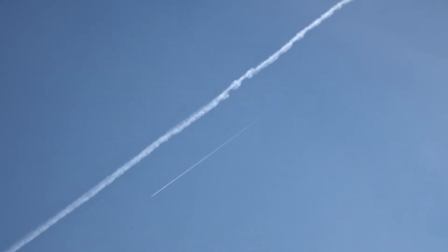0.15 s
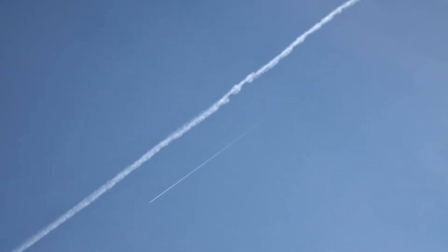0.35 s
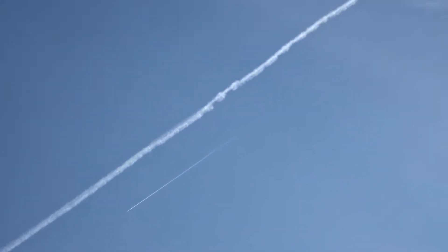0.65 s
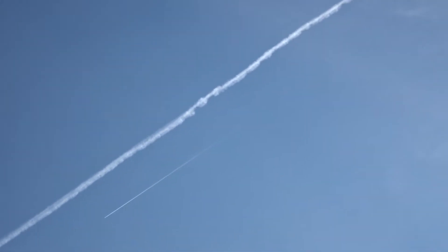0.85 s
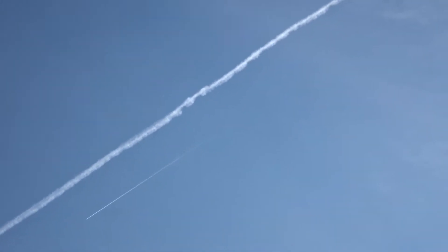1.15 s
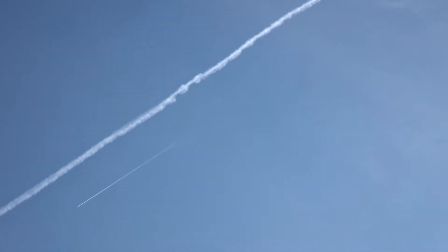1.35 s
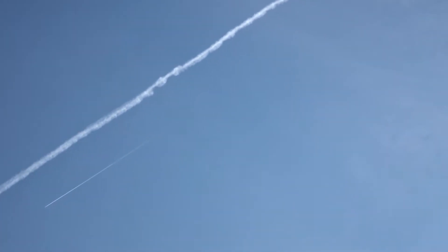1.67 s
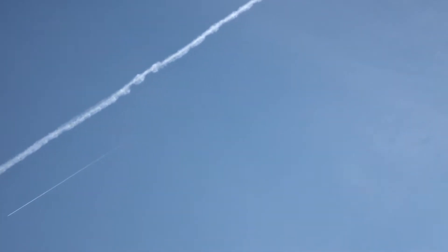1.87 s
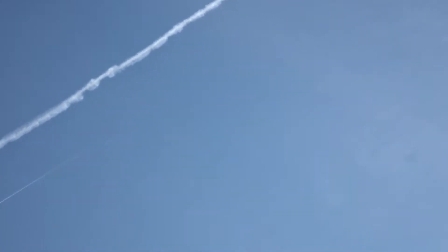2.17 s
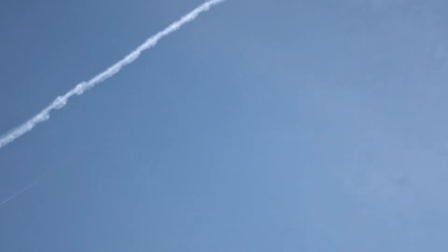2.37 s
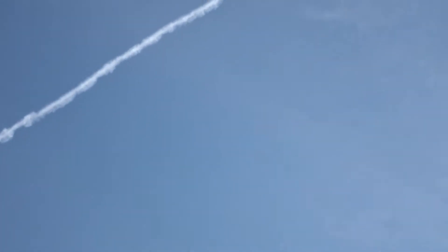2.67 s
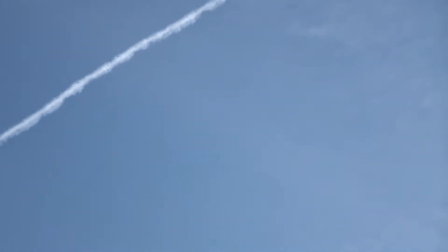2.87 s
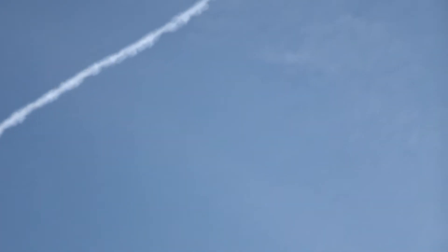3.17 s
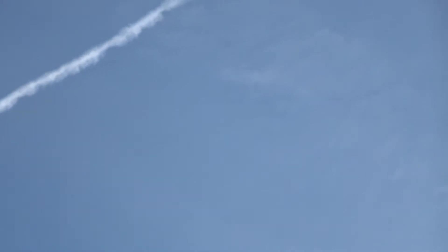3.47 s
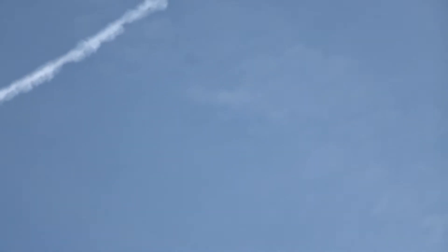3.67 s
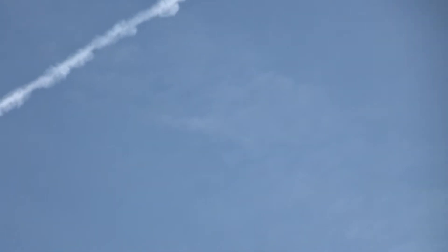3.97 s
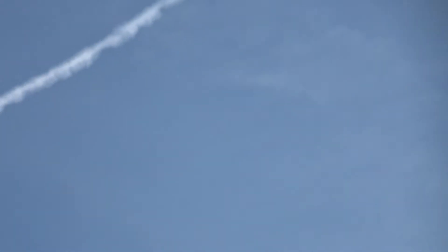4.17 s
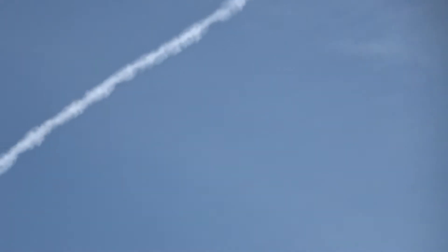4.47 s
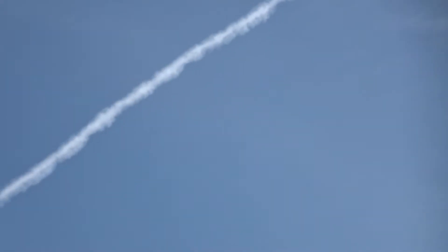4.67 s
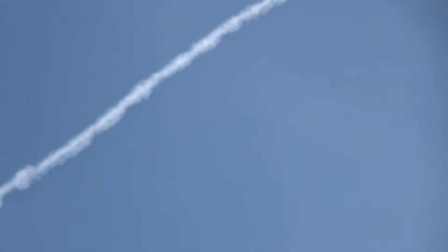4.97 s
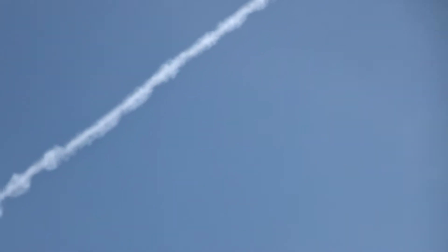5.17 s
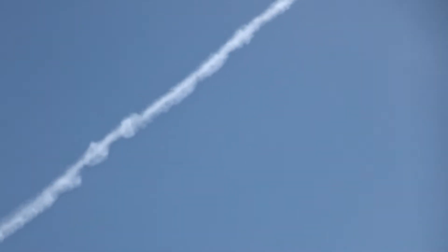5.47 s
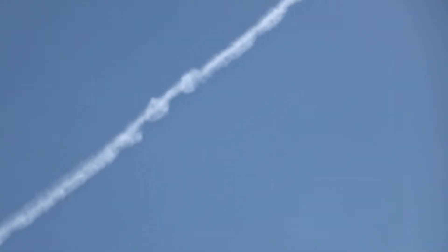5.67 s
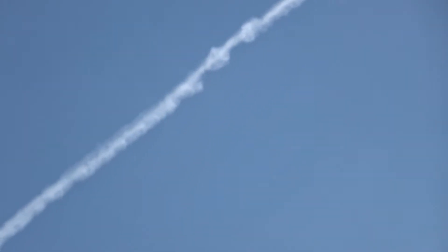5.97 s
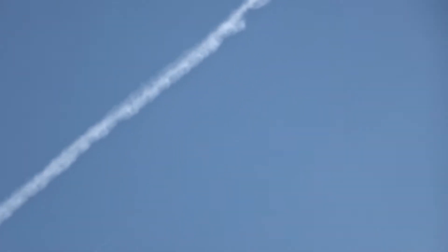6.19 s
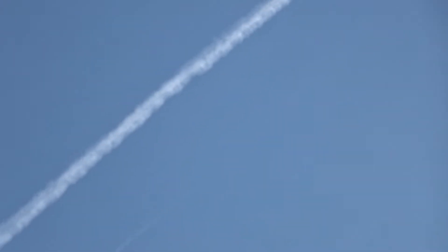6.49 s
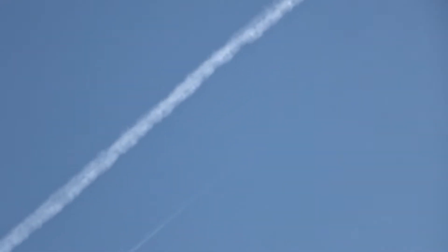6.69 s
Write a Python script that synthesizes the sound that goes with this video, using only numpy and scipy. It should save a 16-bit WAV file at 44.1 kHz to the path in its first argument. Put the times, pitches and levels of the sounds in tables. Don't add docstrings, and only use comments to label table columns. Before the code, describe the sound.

A car rushes past close by with whining tyres, swings off to the right and fades down the street over faint distant traffic.

```python
import sys
import numpy as np
from scipy import signal
from scipy.fft import rfft, irfft, next_fast_len
from scipy.io import wavfile
from scipy.ndimage import uniform_filter1d, map_coordinates

SR = 44100
rng = np.random.default_rng(int(sys.argv[2]) if len(sys.argv) > 2 else 0)


def wrap_up_sound(samples):
    columns = np.atleast_2d(samples).T
    tamed = np.clip(columns, -1, 1)
    steps = np.round(tamed * 32767).astype(np.int16)
    wavfile.write(sys.argv[1], SR, steps)


def boost(x):
    u = np.asarray(x, float) / 20
    return 10 ** u


N = 301196
WIN, HOP = 1024, 256
HZ = np.maximum(np.arange(WIN // 2 + 1) * SR / WIN, 1)[:, None]

# pitch_hz, likeness_scattered (0-1), likeness_in_sight (0-1),
# pan_share_near, pan_share_away
PORTS = [(60, 0.92, 0.94, 0.29, -0.59), (296, 0.99, 1, 0.074, 0.3), (660, 0.94, 0.96, 0.28, 0.18),
         (985, 0.9, 0.95, 0.61, 0.93), (1505, 0.96, 0.24, 0.65, 0.74), (1920, 0.2, 0.81, 0.76, 0.63),
         (2690, 0.76, 0.66, 1.09, -0.62), (3820, 0.5, 0.34, 0.25, 1.65), (4560, 0.75, 0.49, 0.037, 0.42),
         (5400, 0.06, 0.64, 0.08, -0.24), (6700, 0.42, 0.9, -0.24, 0.78), (7800, 0, 0.45, -0.29, -0.48),
         (10000, 0, 0.46, 0.19, 0.63), (10700, 0.13, 0.45, -0.099, 2.2)]
LAG_AWAY = 4.2
TOP_HZ = 11090


def over_hz(table, index=1):
    t = np.array(table)
    return np.interp(np.log(HZ), np.log(t[:, 0]), t[:, index])


def over_time(table, at):
    s, *columns = np.transpose(table)
    return [np.interp(at, s, c) for c in columns]


def after(t, s, span):
    return .5 + .5 * np.tanh((t - s) / span / 2)


def swells(t, table, span):
    return sum(db * np.exp(-((t - s) / span) ** 2) for s, db in table)


def resonances(hz, table):
    return sum(db * np.exp(-((hz - centre) / w) ** 2) for centre, w, db in table)


def walk(frames, rate, bands_per_octave):
    lattice = rng.standard_normal((40, 400))
    rows = np.log2(np.maximum(HZ, 30) / 30) * bands_per_octave + 0 * frames
    columns = np.clip(frames * rate, 0, 398) + 0 * HZ
    field = map_coordinates(lattice, [rows, columns], order=3)
    return field / field.std()


def spread(gain, alike, lag, pan_db):
    noise = rng.standard_normal((3, N))
    shared, left, right = signal.stft(noise, SR, nperseg=WIN, noverlap=WIN - HOP)[2]
    alike = np.clip(alike, 0, 1)
    lag = lag / (1 + (2400 / HZ) ** 6)
    left = np.sqrt(alike) * shared * np.exp(-2j * np.pi * HZ * lag / SR) + np.sqrt(1 - alike) * left
    right = np.sqrt(alike) * shared + np.sqrt(1 - alike) * right
    pair = gain * np.array([left * boost(pan_db / 2), right * boost(-pan_db / 2)])
    return signal.istft(pair, SR, nperseg=WIN, noverlap=WIN - HOP)[1][:, :N]


def drone(t, hz, db, width, count):
    kicks = rng.standard_normal((count, N)) * np.sqrt(2 * np.pi * width / count / SR)
    drift = np.cumsum(uniform_filter1d(uniform_filter1d(kicks, size=90), size=90), axis=1)
    own_hz = hz + (np.arange(count)[:, None] / (count - 1) - .5) * width
    start = 2 * np.pi * rng.random((count, 1))
    return 2 * np.pi * np.cumsum(own_hz, axis=1) / SR + drift + start, boost(db) * np.sqrt(2 / count)


def bearing(t):
    return 1.5 - 14 * after(t, 0.78, 0.26) + 3.5 * after(t, 1.7, 0.22)


def damper(frames):
    loss_db = -12.5 * np.exp(-((frames - 2.35) / 1.17) ** 2) - 5.0
    loss_db = loss_db + 8 * after(frames, 3.87, 0.034)
    loss_db = loss_db - 7 * (after(frames, 3.705, .006) - after(frames, 3.785, .008))
    edge_hz = 4100 + 450 * (1 - after(frames, 2.4, 0.1))
    return loss_db / (1 + (edge_hz / HZ) ** 24)


def passing_bands(frames):
    band_changes = [(.1, .16, 4650, 4680, -5), (.15, .16, 2450, 2450, 2.5), (.15, 0.085, 4020, 3950, 3),
                    (.55, 0.19, 2600, 2620, -8), (.69, .1, 2850, 3280, -9), (.72, 0.065, 4300, 4200, -4),
                    (.92, 0.072, 2420, 2550, -8), (1.03, 0.18, 3500, 3600, 1), (1.15, 0.083, 1900, 1850, -5),
                    (1.3, .15, 3250, 3250, 1), (1.47, 0.079, 1460, 1450, 7), (1.62, .1, 4750, 4750, -6),
                    (1.9, 0.24, 2980, 3000, -9), (1.9, 0.44, 7700, 7700, 1.5), (2.1, 0.19, 4070, 4150, 7),
                    (2.2, 0.13, 10050, 10050, 2), (2.9, 0.3, 1220, 1300, -6), (3.0, .6, 7950, 7800, -8),
                    (3.0, 0.23, 6200, 6200, 3), (3.1, 0.21, 3700, 3700, 4), (3.25, 0.33, 4400, 4400, -6),
                    (3.4, 0.32, 3100, 3100, -6)]
    width = 0.044
    out = 0
    for s, span, first_hz, last_hz, db in band_changes:
        along = (frames - s) / span
        hz = (first_hz + last_hz) / 2 + (last_hz - first_hz) / 2 * np.clip(along, -2, 2)
        out = out + db * np.exp(-along ** 2 - ((HZ / hz - 1) / width) ** 2)
    return out


def town(frames):
    # pitch_hz, level_db (per Hz)
    far_colour = [(50, -28), (125, -21.5), (180, -14.5), (300, 1), (420, -24), (750, 1), (1100, 3.5),
                  (1450, 1.5), (1900, -1.5), (2500, -9.5), (3300, -13.5), (4500, -20.5), (6500, -30.5),
                  (11000, -47)]
    gain = boost(over_hz(far_colour))
    gain = gain * boost(-47.5) / np.sqrt(np.mean(gain ** 2))
    bass = 1 / (1 + (HZ / 250) ** 2)
    swell_db = (1.4 + bass) * (bass + .5) * walk(frames, 2.55, 2.3) + 1.17 * walk(frames, 14, 2.91)
    swell_db = swell_db + damper(frames) + .6 * passing_bands(frames)
    next_car = after(frames, 5.1, 0.51) - .5
    swell_db = swell_db + 4 * next_car * np.exp(-np.log2(HZ / 2780) ** 2)
    return spread(gain * boost(swell_db), over_hz(PORTS, index=2), LAG_AWAY, -3.6 * over_hz(PORTS, index=3))


def lorry(t):
    # start_s, level_db
    surges = [
        (4.9, 9.5),
        (5.4, 6.5),
        (6.37, 6.5),
        (6.79, 4),
    ]
    db = -71.5 + swells(t, surges, 0.17)
    turn, size = drone(t, 174.4 + 0 * t, db, 25.0, count=3)
    return np.clip((t - 3.36) / 0.16, 0, 1) * size * np.sin(turn).sum(axis=0)


def bird(t):
    # start_s, length_s, first_hz, last_hz, level_db
    whistles = [(3.783, .056, 3740, 3800, -58), (3.788, .03, 3920, 3950, -61),
                (3.803, .038, 4200, 3980, -62), (3.833, .066, 3900, 3790, -53), (3.9, .03, 3680, 3750, -70),
                (3.932, .022, 3900, 4600, -66.5), (3.95, .02, 3830, 3720, -53.5),
                (3.964, .068, 3300, 3200, -54.5), (4.03, .055, 3170, 3150, -55),
                (4.085, .045, 3090, 3330, -61), (4.13, .08, 3230, 3330, -68.5),
                (4.26, .05, 3100, 3230, -70)]
    droop_hz, droop_s = 113, 0.0098
    out = 0
    flutter = uniform_filter1d(uniform_filter1d(rng.standard_normal((2, N)), size=90), size=90)
    flutter = flutter / flutter.std()
    waver = .022 * np.sin(2 * np.pi * 62 * t) + .02 * flutter[0]
    waver = 1 + waver * np.clip((3.85 - t) / .02, .3, 1)
    for s, length, first_hz, last_hz, db in whistles:
        done = np.clip((t - s) / length, 0, 1)
        hz = first_hz + (last_hz - first_hz) * done - droop_hz * np.exp(-(1 - done) * length / droop_s)
        edge = np.clip(np.minimum(t - s, s + length - t) / 0.0031, 0, 1)
        tone = np.sin(2 * np.pi * np.cumsum(hz * waver) / SR)
        out = out + np.sqrt(2) * edge * boost(db + 2 * flutter[1]) * tone
    fade = np.exp(-np.arange(SR // 2) / SR / .2)
    tail = rng.standard_normal((2, SR // 2)) * fade * boost(-44.5)
    direct = np.array([boost(0.5) * np.roll(out, shift=4), boost(6.0) * out])
    return direct + signal.fftconvolve(out[None], tail, axes=1)[:, :N]


def hums(t):
    hum_tones = [(.45, .35, 211, -48.5), (.65, 0.34, 332, -45.5), (.72, 0.071, 349, -38),
                 (.87, .08, 535.5, -34), (1.08, .08, 530, -39), (1.331, 0.091, 474.5, -39.5),
                 (.1, 0.22, 1491, -39), (.85, 0.123, 1495, -37.5), (.9, 0.095, 1298, -41),
                 (.5, 0.26, 2934, -53), (.65, .2, 3340, -49), (1.65, 0.24, 3670, -64),
                 (3.5, 0.16, 1843, -54), (4.26, 0.027, 1940, -53)]
    width_hz = 8
    out = 0
    for s, span, hz, db in hum_tones:
        near = slice(max(int((s - 3 * span) * SR), 0), int((s + 3 * span) * SR))
        kicks = np.zeros(N)
        kicks[near] = rng.standard_normal(N)[near] * np.sqrt(2 * np.pi * width_hz / SR)
        turn = 2 * np.pi * hz * t + np.cumsum(uniform_filter1d(kicks, size=200))
        out = out + np.sqrt(2) * boost(db) * np.exp(-((t - s) / span) ** 2) * np.sin(turn)
    return out


def grit(t):
    # start_s, level_db (peak), pitch_hz, length_ms, pan_db (left minus right)
    snaps = [(1.4773, -21.5, 7700, .11, -4), (1.585, -40, 9600, .3, -4), (.976, -32, 9300, .35, -3),
             (2.192, -51, 10100, .8, -4), (2.851, -57, 9400, .4, -4), (3.05, -60, 5530, .6, -1.5),
             (3.159, -64, 5520, .6, -2), (3.25, -63, 6260, .6, -2.5), (3.383, -59, 5330, 1.0, 0),
             (3.685, -66, 10300, .8, -2)]
    out = np.zeros((2, N))
    for s, db, hz, ms, pan_db in snaps:
        snap = np.exp(-((t - s) / ms * 1000) ** 2) * np.cos(2 * np.pi * hz * (t - s))
        out += boost(db + np.array([[pan_db], [-pan_db]]) / 2) * snap
    return out


def engine(t):
    # multiple, level_db (abreast), rise_db_per_s (before), fall_db_per_s (after)
    firing_tones = [(1, -72, -4, 26), (2, -56, 6, 12.5), (3, -59.5, -5, 6)]
    # multiple, level_db (against the third)
    upper_tones = [(4, -4), (5, -23), (6, -27), (7, -6)]
    firing_hz, leaves_s = 49.54, 0.64
    turn = 2 * np.pi * firing_hz * t
    coming, gone = np.maximum(leaves_s - t, 0), np.maximum(t - leaves_s, 0)
    stack = [(k, db - rise * coming - fall * gone) for k, db, rise, fall in firing_tones]
    third_db = stack[-1][1]
    stack = stack + [(k, third_db + db) for k, db in upper_tones]
    wander = np.cumsum(rng.standard_normal((2, len(stack), N // HOP + 1)), axis=2)
    wander = wander - uniform_filter1d(wander, size=90)
    wander_s = np.arange(wander.shape[2]) * HOP / SR
    out = 0
    for (k, db), *pair in zip(stack, *wander):
        slip, swell = (np.interp(t, wander_s, uniform_filter1d(w, size=12) / w.std()) for w in pair)
        phase = k * (turn + 0.38 * slip) + 2 * np.pi * rng.random()
        out = out + np.sqrt(2) * boost(db + swell) * np.sin(phase)
    return out


def fan(t):
    # start_s, pitch_hz, level_db
    blade_song = [
        (0, 1480, -45),
        (.25, 1330, -31),
        (.5, 1282, -33),
        (.66, 1290, -31),
        (.8, 1320, -50),
        (1.0, 1320, -35),
        (1.2, 1326, -77),
        (1.5, 1320, -90),
    ]
    turn, size = drone(t, *over_time(blade_song, t), 110 + 0 * t, count=5)
    return size * np.sin(turn).sum(axis=0) * boost(0.3 * np.array([bearing(t), -bearing(t)]))


def whine(t):
    # start_s, pitch_hz, level_db
    tread_tone = [(0, 730, -37), (.15, 750, -31), (.22, 765, -32), (.4, 770, -34), (.53, 772, -32.5),
                  (.66, 782, -31), (.9, 800, -27), (1.1, 885, -27.5), (1.35, 955, -33.5), (1.7, 940, -75)]
    # start_s, level_db
    in_step = [(.03, -31), (.06, -33), (.09, -30), (.125, -31.5), (.165, -30), (.46, -29), (.55, -40),
               (.612, -27.5), (0.645, -22), (.686, -27), (.728, -31), (.757, -25.5), (0.793, -25.5),
               (.828, -25), (0.852, -26), (.884, -31), (.915, -28.5), (0.947, -28.5), (1.012, -32),
               (1.073, -26.5), (1.1, -38), (1.17, -29)]
    flare_s, flare_wander_hz = .011, 22
    hz, db = over_time(tread_tone, t)
    width = 30 + 61 * t + 170 * np.exp(-((t - 1.1) / .15) ** 2)
    turn, size = drone(t, hz, db - 3, width, count=9)
    kicks = uniform_filter1d(rng.standard_normal(N), size=180)
    drift = np.cumsum(kicks) * np.sqrt(2 * np.pi * flare_wander_hz / SR)
    flares = sum(boost(level) * np.exp(-((t - s) / flare_s) ** 2) for s, level in in_step)
    tone = size * np.sin(turn).sum(axis=0)
    tone = tone + np.sqrt(2) * flares * np.sin(2 * np.pi * np.cumsum(hz) / SR + drift)
    return tone * boost(0.19 * np.array([bearing(t), -bearing(t)]))


def tyres(frames):
    # start_s, level_db (rush), away (0-1)
    path = [(0, -34, 0.12), (.3, -31.5, 0.12), (.6, -28, 0.27), (.85, -27, 0.35), (1.1, -26.5, 0.38),
            (1.4, -29, 0.58), (1.7, -32.5, 0.75), (2.2, -36.5, 0.88), (2.7, -39, 0.85), (3.1, -41.5, 0.87),
            (3.8, -44, 0.84), (4.3, -45, 0.82), (5.1, -47.5, 0.75), (5.7, -49, 0.9), (6.83, -51, 0.56)]
    # pitch_hz, level_db (per Hz)
    near_colour = [(50, -20), (125, -20.5), (190, -10), (300, -3), (420, -11.5), (550, -4), (700, -6.5),
                   (1050, 7.5), (1250, 3), (1620, 1.5), (1950, -8.5), (2250, -11), (4000, -13.5),
                   (6700, -17.5), (11000, -20.5)]
    away_colour = [(50, -46), (125, -31), (180, -17.5), (420, -6.5), (750, 3), (1200, 0), (1800, 6.5),
                   (2500, -5.5), (3000, -17.5), (4050, -33.5), (4350, -26), (7800, -32), (8700, -34),
                   (11000, -44.5)]
    # pitch_hz, width_hz, level_db
    grooves = [(5200, 310, 3.5), (6200, 180, 2.5), (7400, 150, -0.5), (7950, 330, 0), (8800, 260, 5),
               (9580, 300, 7.5)]
    bay = [(1070, 135, -7.5), (1400, 250, 0.5), (2000, 64, -6), (2240, 260, 1), (2560, 100, -0.5),
           (3500, 120, 2), (3900, 82, 3), (4350, 220, -2), (5200, 200, -0.5), (6500, 250, 3.5)]
    # low_hz, high_hz
    zones = [(300, 1100), (1200, 1900), (2500, 5000), (7500, 11000)]
    # behind_db, nose_adds_db, corner_adds_db, air_loss_db_per_s
    zone_rules = [(-8, 14, 1.1, -0.52), (-6, 3.5, -5, 1.5), (-10.5, 0.6, -1.5, 6)]
    # start_s, level_db
    passes = [(.16, 1), (.36, 4), (.52, 3), (.72, 4.5), (.98, 4), (1.18, 4.5), (1.38, 3.5), (1.44, -2.5),
              (1.59, 6.5), (1.73, 3), (1.78, 3.5), (1.99, 2), (2.19, 4), (2.3, 1), (2.38, 2), (2.45, 0),
              (2.6, 0), (2.8, 3), (2.925, 5), (2.96, 5), (3.0, 10), (3.07, 6), (3.12, 5), (3.18, 2),
              (3.26, 4), (3.335, 4), (3.4, 4), (3.45, 7), (3.49, 7), (3.595, 6), (3.665, 6), (4.0, 4),
              (4.15, 1)]
    corner_s = 1.48

    body_db, away = over_time(path, frames)
    nose = 1 - after(frames, 0.67, 0.15)
    hidden = after(frames, corner_s, 0.066)
    lag = -1.2 + (LAG_AWAY + 1.2) * after(frames, .62, .19)
    colour_db = (1 - away) * over_hz(near_colour) + away * over_hz(away_colour)
    gain = boost(colour_db + away * resonances(HZ, grooves) + nose * resonances(HZ, bay))

    echo_hz = 885 - 50 * away
    echo = np.maximum(0.37 * (1 - after(frames, 0.93, 0.15)), .42 * (1 - away))
    bounce = np.exp(-HZ / TOP_HZ) * np.exp(-2j * np.pi * (HZ / echo_hz - .6))
    gain = gain * np.abs(1 + echo * bounce)

    gone = np.clip(frames, corner_s, 4.5) - corner_s
    above_db = [db + nose_db * nose + corner_db * hidden - air * gone
                for db, nose_db, corner_db, air in zone_rules]
    inside = [(HZ[:, 0] > lo) & (HZ[:, 0] < hi) for lo, hi in zones]
    have = [np.sqrt(2 / WIN * np.sum(gain[rows] ** 2, axis=0)) for rows in inside]
    zone_db = np.array([body_db, *(body_db + d for d in above_db)]) - 20 * np.log10(have) + 0.29
    centres = np.log([np.sqrt(lo * hi) for lo, hi in zones])
    zone = np.interp(np.log(HZ[:, 0]), centres, np.arange(len(zones)))
    trim_db = sum(np.maximum(1 - np.abs(zone - k), 0)[:, None] * d for k, d in enumerate(zone_db))

    turns_db = swells(frames, [p for p in passes if p[0] < 2.7], 0.034) - 1.5
    turns_db = turns_db + swells(frames, [p for p in passes if p[0] >= 2.7], 0.02)
    bright = 1 / (1 + ((6500 + 1700 * away) / HZ) ** 9)
    bumps_db = .55 * walk(frames, 56, .3) / (1 + (900 / HZ) ** 4)
    flutter_db = .6 * walk(frames, 7, 3) + bumps_db + 1.3 * bright * walk(frames, 26, 1.6)

    sight = after(frames, 1, 0.037) * (1 - 0.11 * frames)
    alike = (1 - sight) * over_hz(PORTS, index=1) + sight * over_hz(PORTS, index=2)
    alike = alike + .09 * sight * bright * turns_db
    shade = (1 - away ** 2) * over_hz(PORTS, index=3) + away ** 2 * over_hz(PORTS, index=4)
    level_db = trim_db + bright * turns_db + flutter_db + passing_bands(frames) + .5 * damper(frames)
    return spread(gain * boost(level_db), alike, lag, bearing(frames) * shade)


def jolt(t, rush):
    # start_s, level_db
    seams = [(0.043, 0.5), (.17, 2), (0.277, 3.5), (.35, 1.5), (0.471, 1), (.643, 0.5), (.72, 1.5),
             (0.764, 4), (.825, 0), (.95, 2), (1.071, 0), (1.107, 0.5), (1.17, 1), (1.56, -1), (1.695, 2),
             (1.785, 2.5)]
    upper = signal.sosfiltfilt(signal.butter(2, 1050, "high", fs=SR, output="sos"), rush)
    turn = 2 * np.pi * (49.4 * t - .46)
    throb = .14 * (1 - after(t, 1.0, .2)) * (np.cos(turn) + .4 * np.cos(2 * turn))
    return (rush + throb * upper) * boost(swells(t, seams, 0.0034))


def scene():
    t = np.arange(N) / SR
    frames = np.arange(-(-N // HOP) + 1) * HOP / SR
    street = town(frames) + lorry(t) + bird(t)
    steady = hums(t) + grit(t) + engine(t)
    return street + steady + jolt(t, fan(t) + whine(t) + tyres(frames))


def band_limit(x):
    return signal.sosfilt(signal.butter(12, 11740, fs=SR, output="sos"), x)


def record(dry):
    # pitch_hz, width_hz, level_db
    cavities = [(5770, 360, 2), (10420, 270, 4)]
    size = next_fast_len(N + SR // 4)
    hz = np.arange(size // 2 + 1) * SR / size
    treble = np.clip((TOP_HZ - hz) / 100, 0, 1)
    bass = np.clip(hz / 60, 0, 1)
    response = boost(resonances(hz, cavities)) * treble * bass
    mix = irfft(rfft(dry, size) * response, size)[:, :N]
    return band_limit(mix)


dry = scene()
out = record(dry)
wrap_up_sound(out)
```